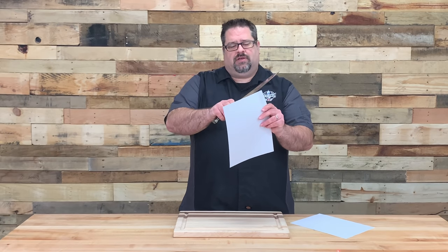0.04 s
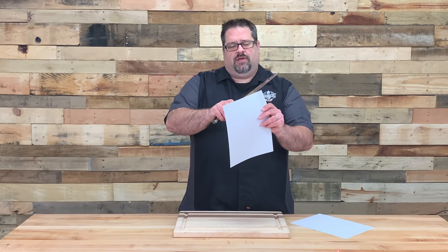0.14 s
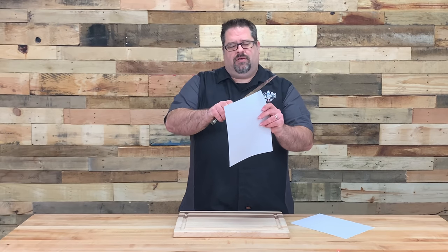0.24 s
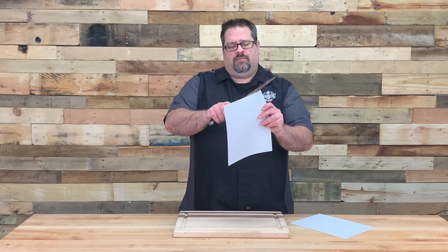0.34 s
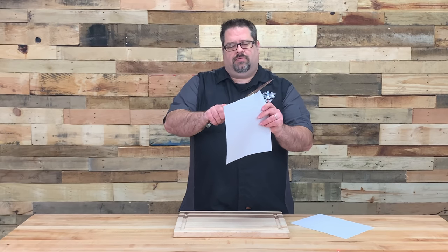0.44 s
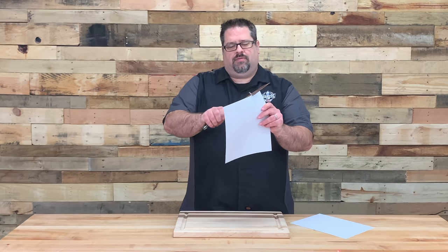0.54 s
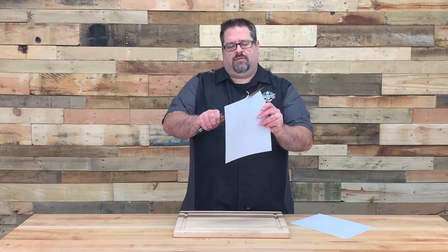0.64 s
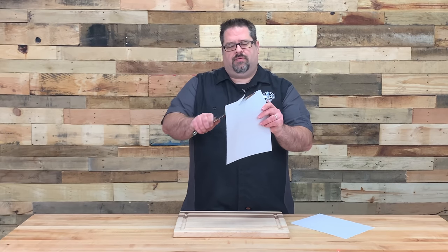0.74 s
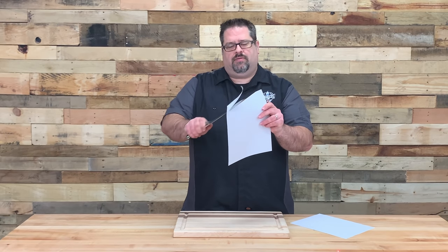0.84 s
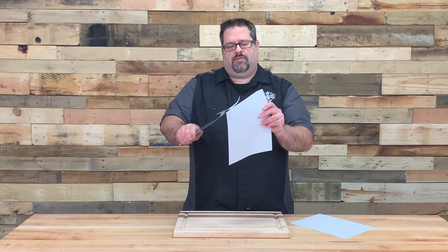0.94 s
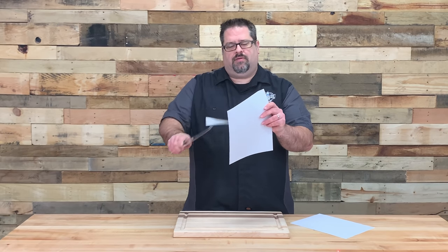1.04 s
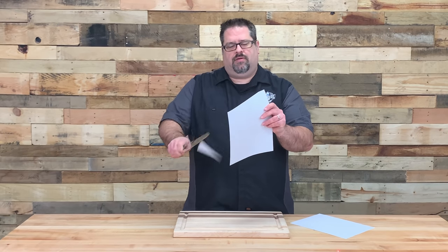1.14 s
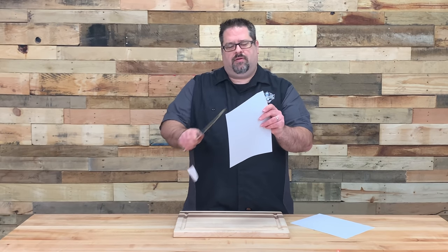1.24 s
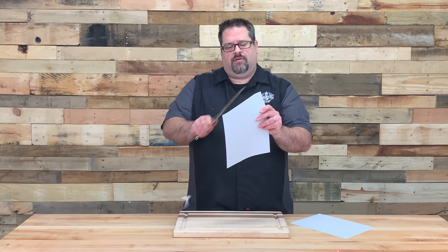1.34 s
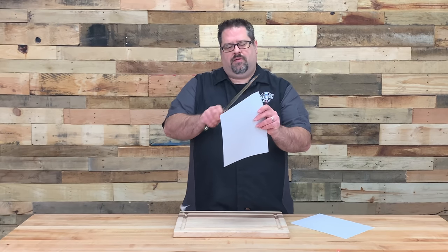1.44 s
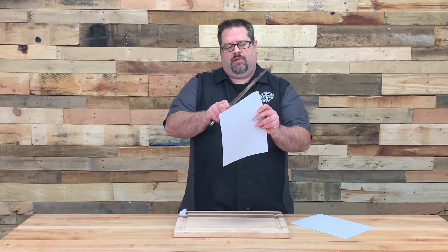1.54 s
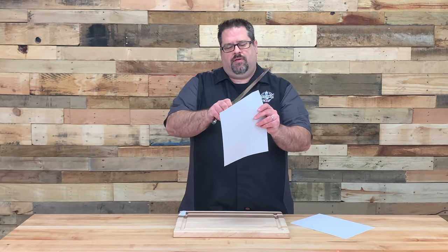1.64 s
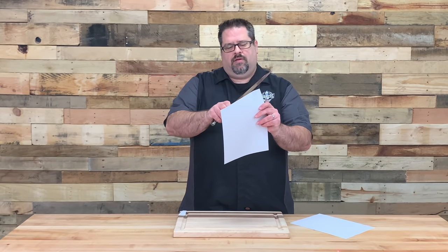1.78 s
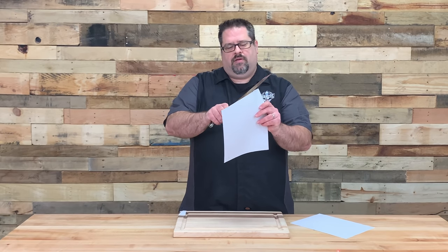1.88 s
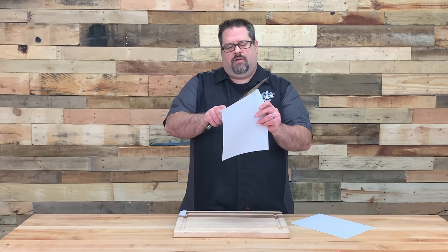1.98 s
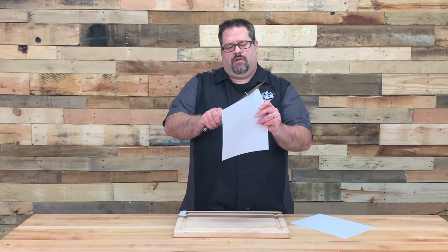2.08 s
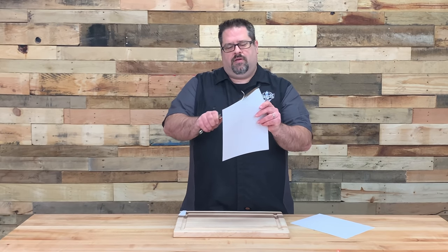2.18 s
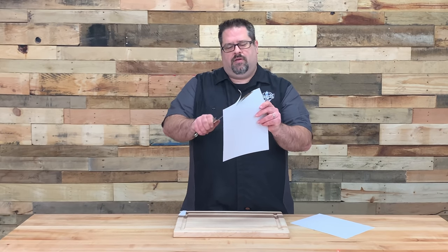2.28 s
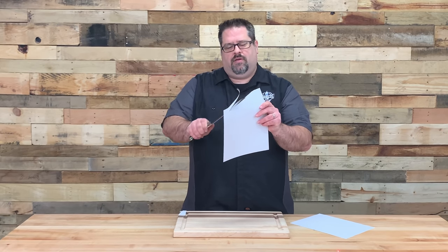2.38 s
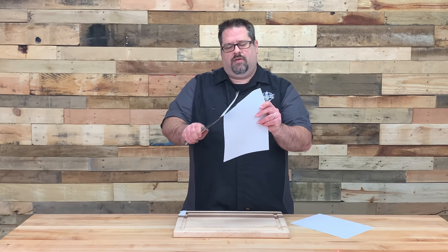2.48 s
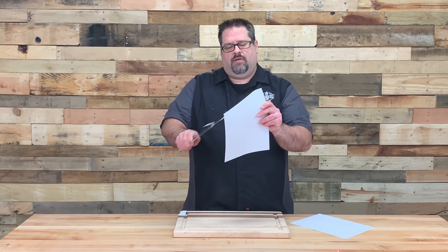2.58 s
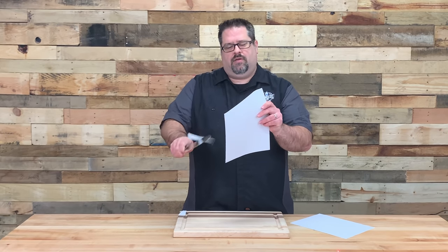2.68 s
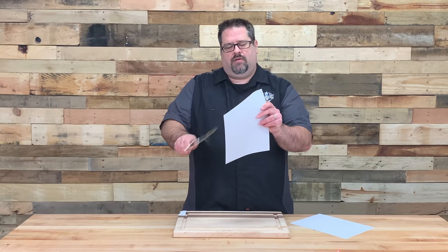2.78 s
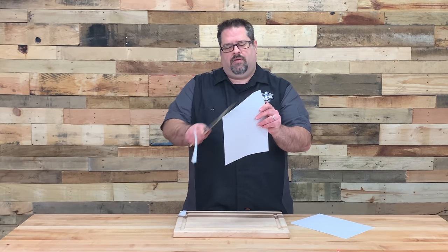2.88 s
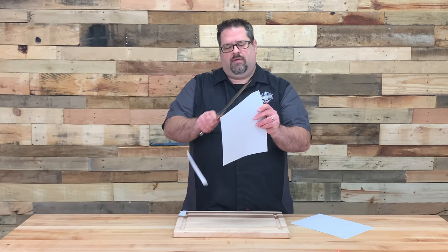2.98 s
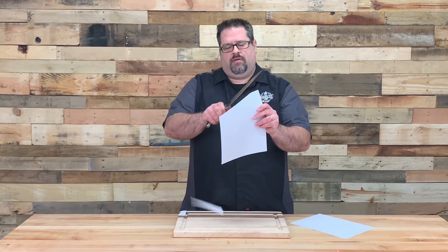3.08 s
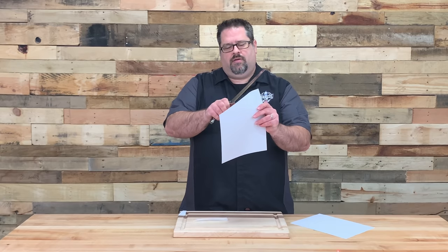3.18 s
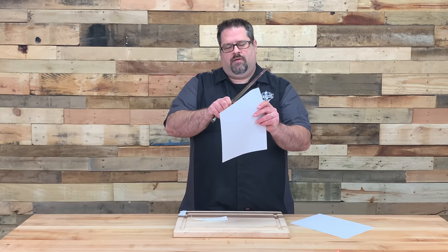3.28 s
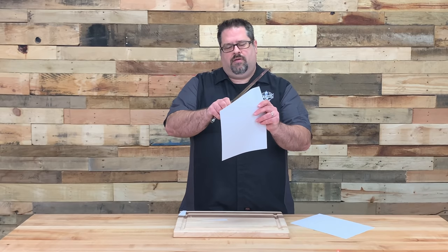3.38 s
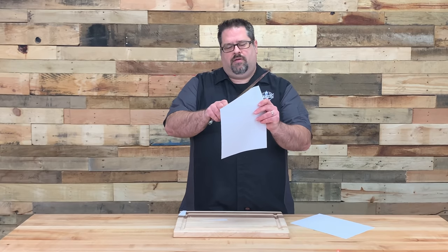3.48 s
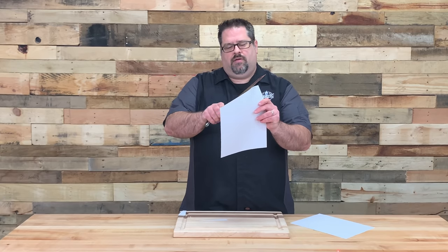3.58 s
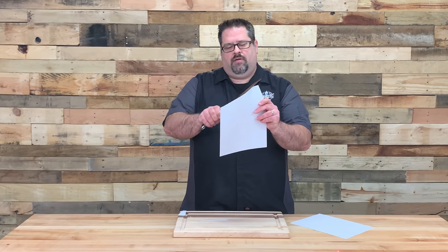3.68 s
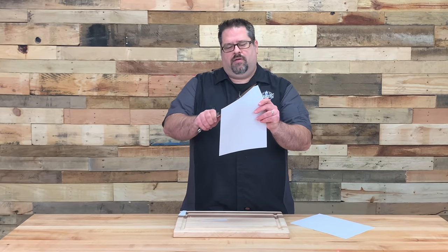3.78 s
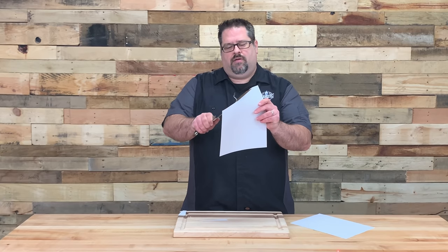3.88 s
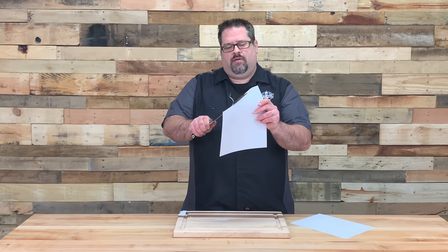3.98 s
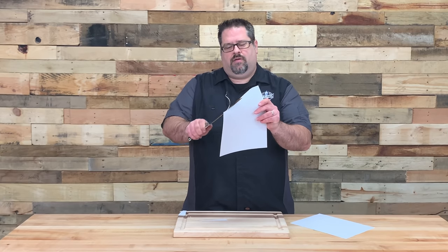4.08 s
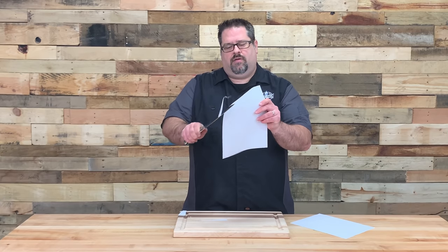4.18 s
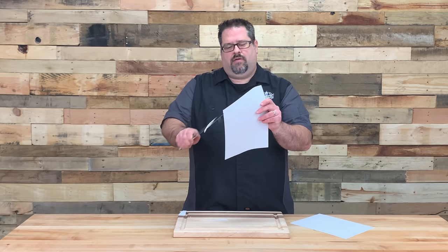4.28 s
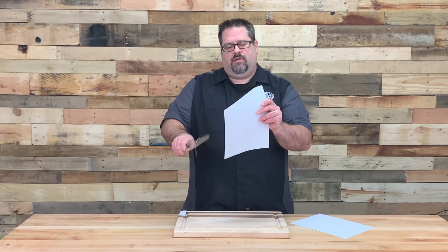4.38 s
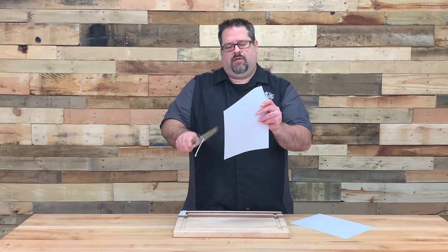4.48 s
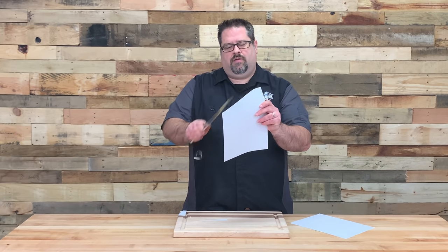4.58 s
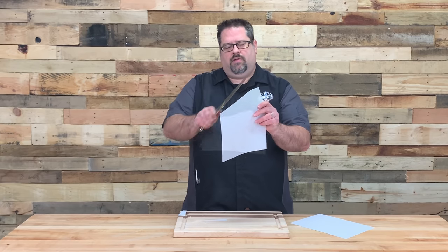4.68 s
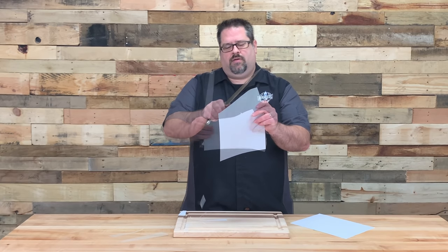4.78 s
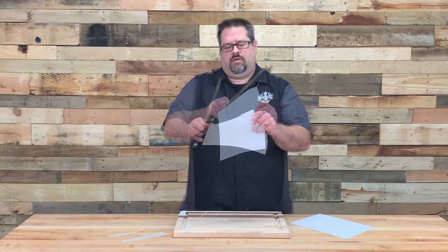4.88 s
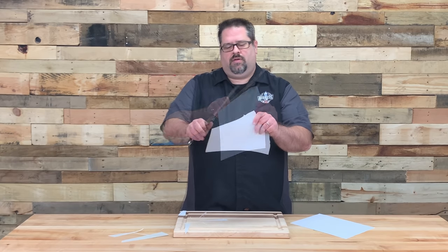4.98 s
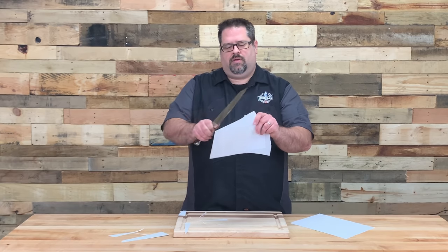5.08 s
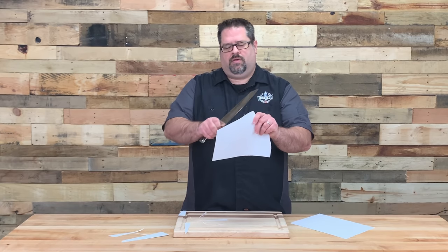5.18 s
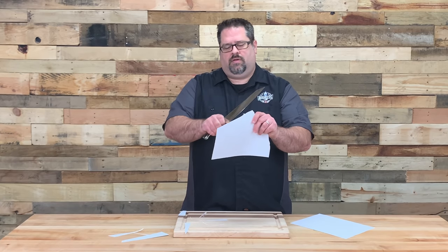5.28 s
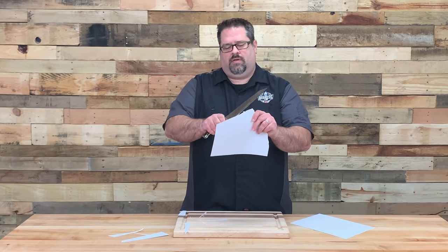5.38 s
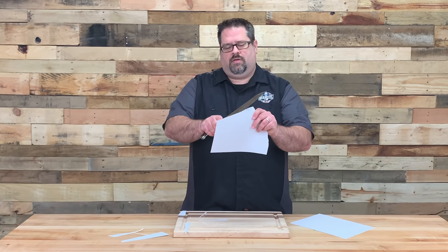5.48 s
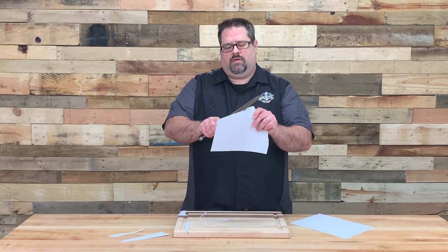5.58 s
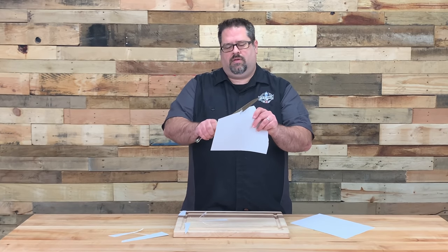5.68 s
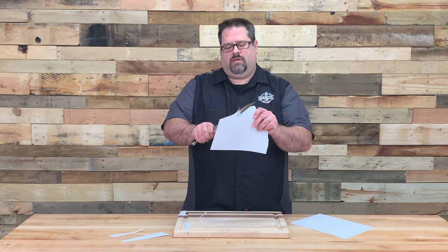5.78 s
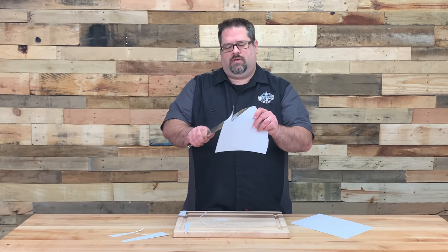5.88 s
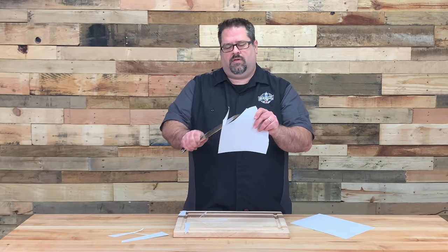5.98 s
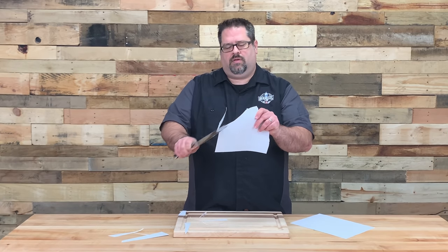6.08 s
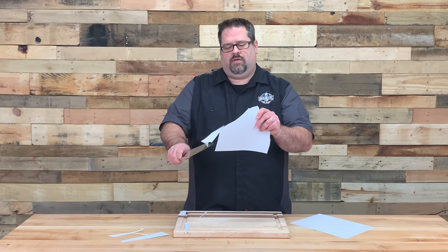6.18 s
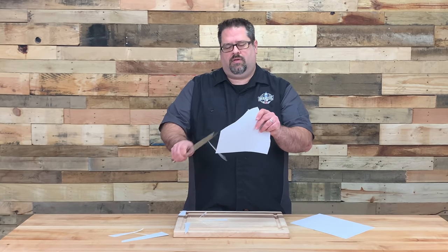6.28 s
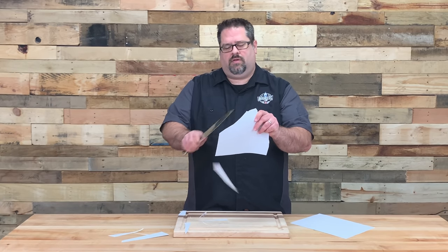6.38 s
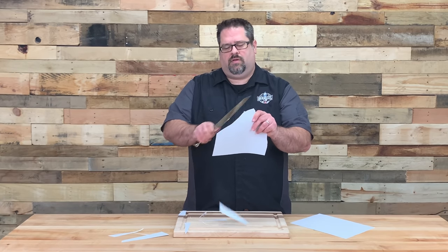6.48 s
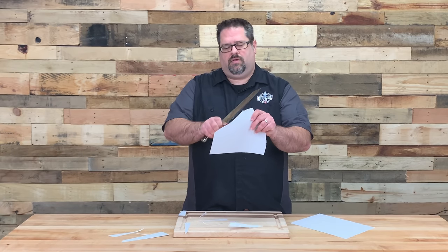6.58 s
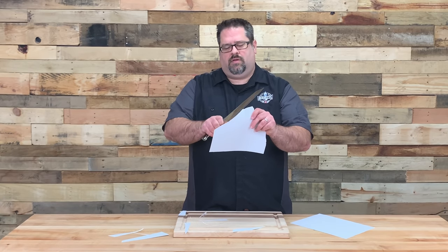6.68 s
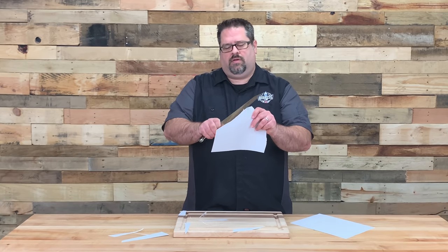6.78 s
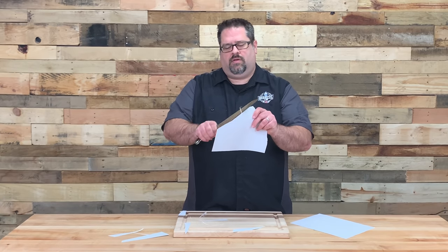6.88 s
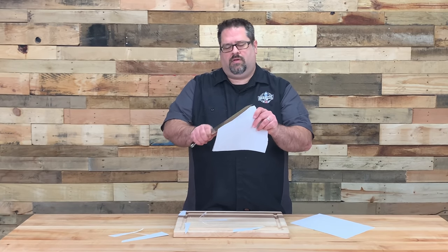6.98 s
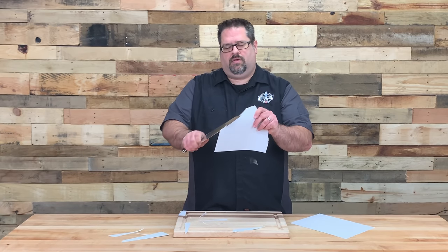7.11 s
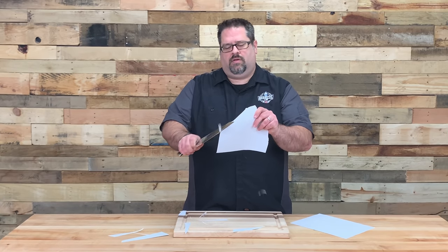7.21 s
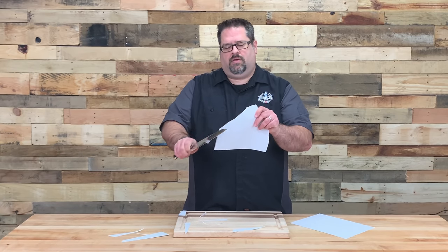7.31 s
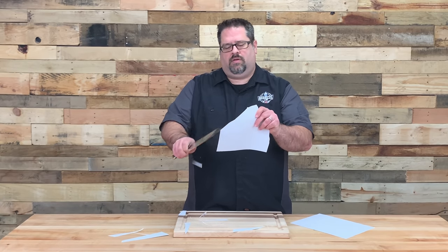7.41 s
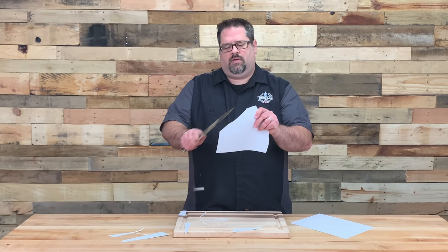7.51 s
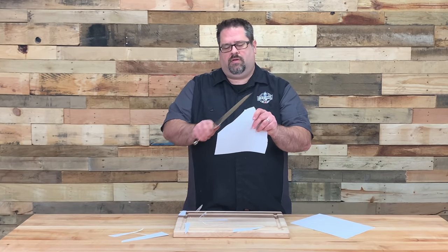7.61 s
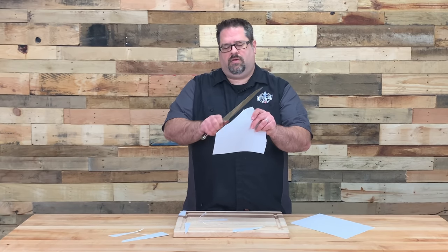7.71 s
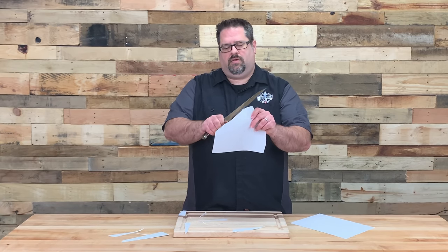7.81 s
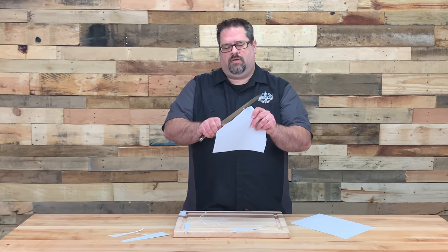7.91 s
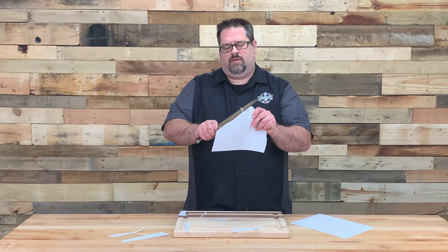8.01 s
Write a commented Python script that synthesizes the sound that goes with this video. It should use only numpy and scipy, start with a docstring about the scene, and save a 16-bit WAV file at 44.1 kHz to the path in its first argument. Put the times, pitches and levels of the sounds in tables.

```python
"""A dense, dry rasp, six times over: a sharp knife drawn through a sheet of paper held in the air.
The rasp is fibres parting; as each freed strip grows longer, its ringing slides down. Between strokes
the blade taps the edge, cut strips flick free and fingers shift on the sheet. Behind it all is a bare
room with a fan humming. Both channels carry the same sound."""
import sys
import numpy as np
from scipy import signal
from scipy.io import wavfile
from scipy.ndimage import uniform_filter1d, map_coordinates

SR = 44100
rng = np.random.default_rng(int(sys.argv[2]) if len(sys.argv) > 2 else 0)


def materialize(psi):
    """Save the field psi as 16-bit PCM at rate SR to the path in sys.argv[1].

    A 1-D psi becomes a single channel; in a 2-D psi each row is a channel.
    """
    bounded = np.clip(np.atleast_2d(psi).T, -1, 1)
    quanta = np.round(bounded * 32767).astype(np.int16)
    wavfile.write(sys.argv[1], SR, quanta)


N = 355005

# Knife strokes, a table each: time_s, level_db, strip_share (0 all sheet, 1 all strip), lowest_ring_hz
STROKES = [
    [(.107, -48.5, 0.1, 7000), (.17, -35.5, 0, 6850), (.3, -23, 0.05, 6500), (.5, -24, 0.4, 5600),
     (.62, -23.5, 0.64, 4200), (.72, -22, 0.74, 3230), (.8, -26.5, 0.93, 2200), (.856, -30.5, 0.2, 1110)],
    [(1.76, -36.5, 0.12, 6800), (1.83, -24, 0.06, 6250), (2.04, -25.5, 0.49, 5350), (2.2, -23.5, 0.7, 4280),
     (2.35, -21, 0.96, 2880), (2.39, -23.5, 0.76, 2170), (2.432, -25.5, 0.4, 1230)],
    [(3.419, -43, 0.02, 3780), (3.48, -32.5, 0.16, 3600), (3.66, -26.5, 0.51, 3470),
     (3.79, -24.5, 0.48, 3100), (3.95, -24, 0.65, 2960), (4.04, -21, 0.77, 2640),
     (4.116, -24.5, 0.64, 2070)],
    [(5.4, -34, 0.02, 9000), (5.44, -25.5, 0.27, 8300), (5.58, -28.5, 0.47, 7750),
     (5.66, -27.5, 0.66, 5500), (5.74, -23, 0.7, 4000), (5.85, -25, .55, 3150), (6.005, -28, 0.45, 2450)],
    [(6.652, -27.5, 0.08, 3100), (6.69, -24, 0.55, 2960), (6.87, -28.5, 0.47, 2970),
     (6.92, -40.5, 0.37, 2800), (7.03, -26, 0.76, 2630), (7.12, -23, 0.99, 2350), (7.168, -26, 0.49, 1580)],
    [(7.792, -26.5, 0., 6600), (7.838, -26.5, 0.33, 6500), (7.9, -28, 0.33, 6500), (8.05, -30, 0.34, 6100)],
]
# Bands of the rasp (flap, drum, low tear, high tear, bite, low hiss, high hiss): centre_hz
RASP_BANDS = [330, 1150, 2300, 4300, 6200, 8200, 14000]
# Tone as the strip takes over, against the tear: strip_share, flap_db, drum_db, bite_db, hiss_db
TAKEOVER_TONE = [(0., 2.5, -1, -4.5, -19), (.2, -7, 0.5, -9.5, -15.5), (.5, -11., -1, -3.5, -5.5),
                 (.7, -14, -13, -4.5, -11.5), (1., -28.5, -13.5, -7.5, -4.5)]
# Tone of the grip, a row a stroke: flap_db, drum_db, bite_db, hiss_db
GRIP_TONE = [(-2.5, 0.5, -2, 2), (0., 2, -4.5, 1), (0.5, -0.5, 1, -2.5), (1, 2, 1., 4.5), (1, -1.5, -3, 0),
             (-3.5, -3, -1, 6)]
# Rings of a fully free strip: pitch_ratio, width_octaves, boost_db
STRIP_MODES = [(1.0, .55, 10), (2.0, .17, 10), (3.4, .17, 13), (5.2, .1, 9)]
# How freely each stroke's strip rings once it has taken over: freedom (0-1)
STRIP_FREEDOM = [.55, .6, .75, .5, .15, .45]
# Body resonances of the held sheet, scaled in use: frequency_hz, boost_db
SHEET_BODY = [(200, 1.5), (430, 6.5), (750, 2), (1150, 7), (1650, 5), (2100, 6), (3100, 4), (4800, 1.5),
              (6100, 4), (7900, 2.5), (9500, 1.5), (12400, -4), (15500, -6)]
# Fingers and strips rustling: peak_s, level_db, rise_s, t60_s, tilt_db (per octave near 2 kHz)
RUSTLES = [(0.002, -44.5, 0.0031, 0.99, -8), (.86, -41, 0.01, 0.9, -8), (1.379, -40.5, .004, 0.75, -0.14),
           (2.513, -32.5, 0.0079, 0.32, -8.5), (2.7, -52.5, 0.025, 0.62, 1), (2.867, -37, .025, 0.11, -4.5),
           (4.225, -26, 0.016, 0.33, -6), (4.95, -41.5, 0.046, 0.38, -4), (5.076, -48, 0.019, 0.78, -1),
           (6.006, -29, 0.0043, 0.51, -3), (6.471, -37.5, 0.018, 0.015, 1.1),
           (6.496, -27.5, 0.0052, 0.12, -2.5), (6.59, -42.5, 0.017, 0.3, -1), (7.28, -28, 0.0074, 0.15, -7)]
# Blade taps and strip flicks: start_s, level_db, ring_hz, thud_relative_db, tick_relative_db
TAPS = [(0.109, -34, 2500, 1, -14), (0.173, -22.5, 980, -8, -15), (0.2105, -30.5, 1210, 11.5, -25),
        (1.0897, -37, 2730, -18, 9), (1.3797, -44, 1160, -5, -1), (1.405, -30.5, 5500, -19, -13),
        (1.4435, -28.5, 1780, -33, -15), (1.503, -33.5, 1700, -20, -12), (1.7613, -34, 3000, -6, -12),
        (2.5152, -21.5, 1440, -13, -32), (2.6677, -31.5, 2230, -24, 8), (2.6907, -30.5, 4900, -11, -2),
        (2.8055, -45, 2240, -8, 10), (2.8445, -34.5, 1180, -1, -26), (2.867, -29, 890, 3, -32),
        (3.0828, -12, 7200, -50, -32), (3.0927, -11.5, 2260, -48, -9), (3.4193, -41, 3000, -7, -10),
        (4.2265, -20, 1110, -27, -37), (4.847, -42, 4500, -24, -2), (4.9418, -22.5, 1390, -0.5, -33),
        (5.071, -44.5, 1420, 7, -17), (5.2187, -27, 1750, -1, -14), (5.401, -31, 1110, -4, -5),
        (6.4919, -12.5, 2580, -51, -9), (6.6552, -22, 258, 1, -24), (6.699, -23.5, 525, 5.5, -30),
        (7.268, -36, 5000, -30, -15), (7.2797, -26, 1210, -5, -35), (7.7997, -14.5, 2980, -11, -24),
        (7.8169, -12, 1240, -12, -21), (7.8412, -9, 1440, -38, -31)]
# Rings of the steel: pitch_hz, gain_db, t60_s
BLADE_MODES = [(2400, -8, .3), (12400, 3, .15)]
# Decay of the bare room: frequency_hz, t60_s
ROOM_DECAY = [(250, 0.4), (700, 0.66), (1800, 0.39), (4600, 0.43), (12000, .3)]
# Spectrum of the fan's rumble and hiss: frequency_hz, relative_density_db
FAN_SPECTRUM = [(13, -47.5), (22, -41), (49, -4), (121, -6.5), (147, -10.5), (173, -13), (317, -12),
                (394, -14.5), (505, -14.5), (829, -24), (925, -23.5), (1600, -30), (2360, -32),
                (3860, -36.5), (15700, -40.5)]
# Hum of the fan: pitch_hz, width_hz, level_db
FAN_HUM = [(121.9, 5.6, -56), (514, 22, -55)]


def knife_cuts():
    """Fibres part in a dense rasp, coloured by the held sheet and the sliding rings of the strip."""
    times, _, shares, _ = np.concatenate(STROKES).T
    # within a stroke the strip only grows longer, so its pitch never rises
    pitches = np.concatenate([np.minimum.accumulate(np.transpose(rows)[3]) for rows in STROKES])
    handovers_s = [rows[-1][0] + .1 for rows in STROKES[:-1]]

    def colour_db(hz, t):
        stroke = np.searchsorted(handovers_s, t)
        share = np.interp(t, times, shares)
        freedom = np.array(STRIP_FREEDOM)[stroke] * np.clip(.3 + share, 0, 1)
        rings_db, shimmer_db = strip_ringing(hz, np.interp(t, times, pitches), freedom)
        grain_db = 3.38 * unit_rms(uniform_filter1d(rng.standard_normal(rings_db.shape), 40, 1))
        body_db = curve_at(SHEET_BODY, hz) * (1.5 - freedom)  # fades as the strip takes over
        bass_cut_db = 21 * np.minimum(np.log2((hz + 1) / 220), 0)  # a small sheet has no deep bass
        tone_db = rasp_tone(hz, share, stroke) + body_db + bass_cut_db + rings_db
        tone_db -= 10 * np.log10(np.mean(gain_of(2 * tone_db), 0))  # same power as the tone shifts
        return tone_db + shimmer_db + grain_db  # the grain is the sheet's many narrow modes
    rasp = fibre_snaps(per_s=24000, spread_db=1.3, clump_db=1.1)
    return gain_of(1) * coloured(rasp, colour_db, size=512) * envelope(STROKES)


def fibre_snaps(per_s, spread_db, clump_db):
    """Fibres give way in tiny snaps of uneven size, clumped over a few milliseconds."""
    snaps = gain_of(spread_db * np.minimum(rng.exponential(1, N), 5)) * rng.standard_normal(N)
    clumps = unit_rms(uniform_filter1d(uniform_filter1d(rng.standard_normal(N), 300), 300))
    snapping = rng.random(N) < per_s / SR
    return unit_rms(snaps * snapping * gain_of(clump_db * clumps))


def rasp_tone(hz, share, stroke):
    """The rasp's EQ in dB, set by the grip and how much the strip's ringing takes over from the sheet."""
    shares, *columns = np.transpose(TAKEOVER_TONE)
    takeover_db = np.array([np.interp(share, shares, column) for column in columns])
    flap, drum, bite, hiss = takeover_db + np.array(GRIP_TONE)[stroke].T
    bands_db = [flap, drum, 0, -1.5, bite, hiss, hiss]
    widths_db = 10 * np.log10([.17, .37, 1, 1, 1, 3.1, 3.1])  # turn band levels into densities
    fades = [curve_at(list(zip(RASP_BANDS, row)), hz) for row in np.eye(len(RASP_BANDS))]
    return sum(fade * (db - width) for fade, db, width in zip(fades, bands_db, widths_db))


def strip_ringing(hz, lowest_hz, freedom):
    """The strip's broad rings and its shimmer of fine ones, in dB, sliding down as it lengthens."""
    upper_hz = 3200 * (np.maximum(lowest_hz, 2600) / 3200) ** .85  # slides less and stops sooner
    rings_db = 0
    for ratio, width, db in STRIP_MODES:
        octaves_off = np.log2((hz + 1) / ratio / (upper_hz if ratio > 1 else lowest_hz))
        rings_db += db * np.exp(-(octaves_off / width) ** 2)
    frames = len(lowest_hz)
    ripple = rng.standard_normal((600, frames))
    ripple = unit_rms(uniform_filter1d(uniform_filter1d(ripple, 8, 0), 60, 1))
    sliding = map_coordinates(ripple, [hz / upper_hz * 40, np.arange(frames) + 0 * hz], order=1)
    depth_db = (1.5 + 3.5 * freedom) * np.clip(hz / 7000, .3, 1)  # clearest in the treble
    return freedom * rings_db, depth_db * sliding


def taps_and_flicks():
    """The blade taps or a strip flicks free: a short burst with a ring, a low thud and a bright tick."""
    length = 4000
    out, t = np.zeros(N + length), np.arange(length) / SR
    thud_band = signal.butter(2, [150, 1000], "bandpass", fs=SR, output="sos")
    low_cut = signal.butter(2, 170, "highpass", fs=SR, output="sos")
    tick_band = signal.butter(2, [6000, 13500], "bandpass", fs=SR, output="sos")
    for start_s, db, hz, thud_db, tick_db in TAPS:
        t60_s = 0.024 * (2300 / hz) ** 0.58  # higher taps die faster
        burst = rng.standard_normal(length) * gain_of(-60 * t / t60_s)
        burst[0] += 2.5  # the first contact is the sharpest
        narrow, broad = (signal.sosfilt(low_cut, resonate(resonate(burst, hz, width), hz, width))
                         for width in (0.5 * hz, min(1.7 * hz, 5000)))
        thud = signal.sosfilt(thud_band, burst)
        tick = signal.sosfilt(tick_band, burst * gain_of(-60 * t / 0.0023))
        for layer, trim_db in [(narrow, -5), (broad, -4), (thud, thud_db), (tick, tick_db)]:
            out[round(start_s * SR):][:length] += gain_of(db + trim_db) * layer / abs(layer).max()
    return out[:N]


def paper_rustles():
    """Shifting fingers and loose strips stir a sparser crackle that swells and dies away."""
    peaks_s, _, rises_s, _, tilts_db = np.transpose(RUSTLES)

    def colour_db(hz, t):
        octaves = np.log2((hz + 1) / 2000)
        tilt = np.maximum(octaves, -2) * (1 + 0.88 * np.maximum(octaves, 0))  # steeper in the treble
        latest = np.maximum(np.searchsorted(peaks_s - rises_s, t) - 1, 0)
        rolloff_db = 3.3 * np.minimum(octaves + 0.76, 0) - 36 * np.maximum(octaves - 2.2, 0)
        return tilts_db[latest] * tilt + rolloff_db + 1.28 * curve_at(SHEET_BODY, hz)
    swells = [[(s - rise, db - 18), (s, db), (s + t60 / 2, db - 30)] for s, db, rise, t60, _ in RUSTLES]
    crackle = fibre_snaps(per_s=9000, spread_db=2.2, clump_db=2.6)
    return gain_of(-2.5) * coloured(crackle, colour_db, size=256) * envelope(swells)


def blade_ring(shake):
    """The steel rings faintly with whatever shakes it."""
    return sum(gain_of(db) * resonate(shake, hz, np.log(1000) / np.pi / t60)
               for hz, db, t60 in BLADE_MODES)


def room_reverb(send):
    """Bare walls return sparse echoes of random sign, each band dying at its own speed."""
    echoes = np.zeros(SR)
    arrivals = np.arange(250, SR - 20, 20) + rng.integers(0, 20, (SR - 251) // 20)
    echoes[arrivals] = rng.choice([-1., 1.], arrivals.shape)
    tail = coloured(echoes, lambda hz, t: -60 * t / curve_at(ROOM_DECAY, hz), size=256)
    return signal.fftconvolve(send, tail / np.linalg.norm(tail))[:N]


def fan(wash_db=-50):
    """Ventilation lays a bed of rumble and hiss with two wavering hum tones."""
    wash = coloured(rng.standard_normal(N), lambda hz, t: curve_at(FAN_SPECTRUM, hz), size=4096)
    hum = sum(gain_of(db) * unit_rms(resonate(rng.standard_normal(N), hz, width))
              for hz, width, db in FAN_HUM)
    return gain_of(wash_db) * unit_rms(wash) + hum


def gain_of(db):
    """Decibels to gain."""
    return 10 ** (np.asarray(db) / 20)


def unit_rms(x):
    """Scales to rms 1."""
    return x / np.sqrt(np.mean(x ** 2) + 1e-20)


def curve_at(points, hz):
    """Reads a curve on a log-frequency axis."""
    points_hz, values = np.transpose(points)
    return np.interp(np.log(hz + 1), np.log(points_hz + 1), values)


def resonate(x, hz, width_hz):
    """A two-pole resonance, gain about 1 when narrow."""
    turn = np.exp(2j * np.pi * hz * np.arange(len(x)) / SR)
    pole = np.exp(-np.pi * width_hz / SR)
    return 2 * (turn * signal.lfilter([1 - pole], [1, -pole], x / turn)).real


def coloured(x, colour_db, size):
    """A moving EQ: filters x by colour_db(hz, t) in frames of size samples."""
    framing = dict(fs=SR, nperseg=size, noverlap=size * 3 // 4)
    hz, t, spectra = signal.stft(x, **framing)
    return signal.istft(spectra * gain_of(colour_db(hz[:, None], t)), **framing)[1][:N]


def envelope(events):
    """A fader ride through each event's (time_s, level_db) points, silent between events."""
    t, out = np.arange(N) / SR, np.zeros(N)
    for rows in events:
        times, db = np.transpose(rows)[:2]
        gate = np.clip(np.minimum(t - times[0] + 1e-4, (times[-1] - t) / 4) / 0.00069, 0, 1)
        out += gain_of(np.interp(t, times, db)) * gate
    return out


def scene():
    """Paper and knife up front, the room and the fan behind."""
    paper = knife_cuts() + paper_rustles()
    taps = taps_and_flicks()
    steel = blade_ring(paper + taps)
    reverb = room_reverb(gain_of(-9.5) * paper + gain_of(-11) * taps)
    return np.tile(paper + taps + steel + reverb + fan(), (2, 1))


def record(dry):
    """A steep low-pass trims the very top of the mix."""
    lowpass = signal.firwin(511, cutoff=15800, window=("kaiser", 9), fs=SR)
    return signal.oaconvolve(dry, lowpass[None], "same")


dry = scene()
out = record(dry)
materialize(out)
```